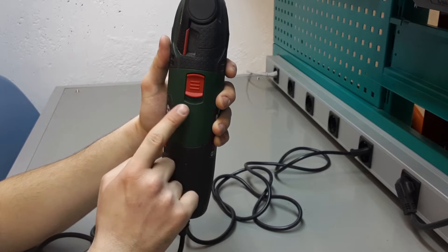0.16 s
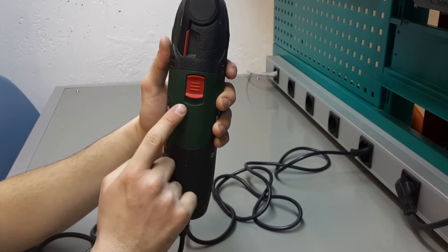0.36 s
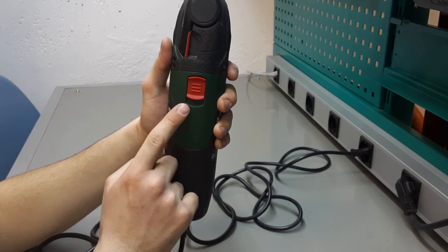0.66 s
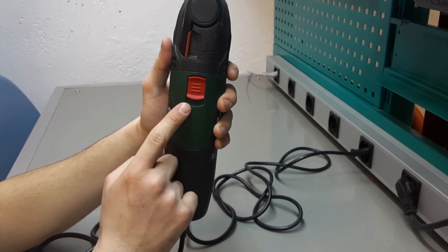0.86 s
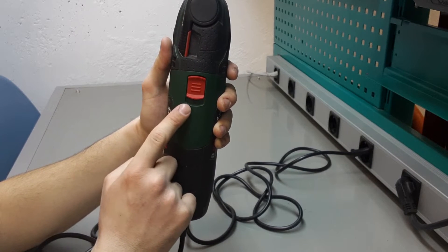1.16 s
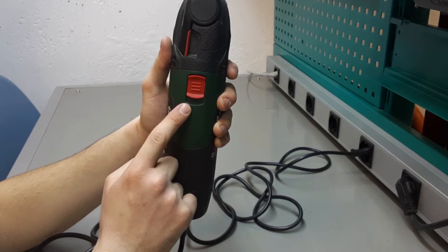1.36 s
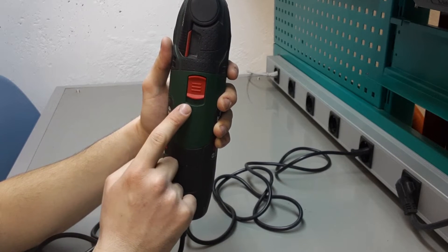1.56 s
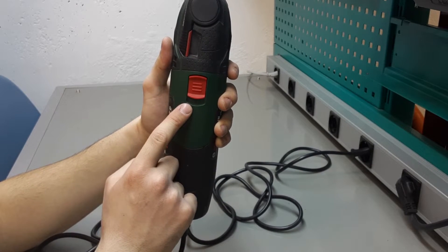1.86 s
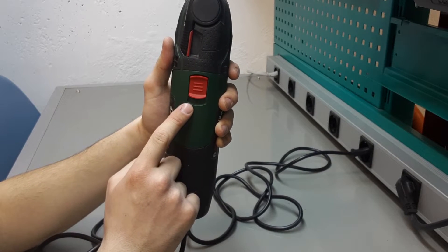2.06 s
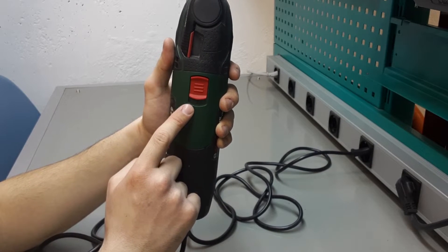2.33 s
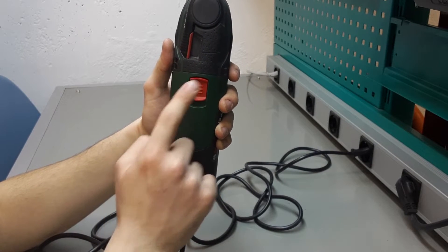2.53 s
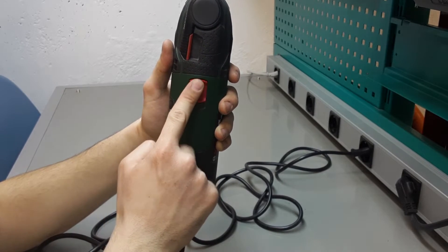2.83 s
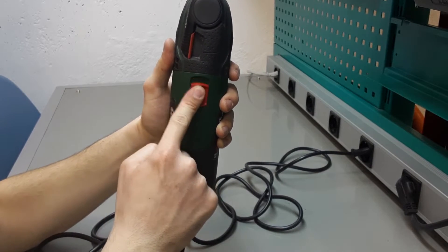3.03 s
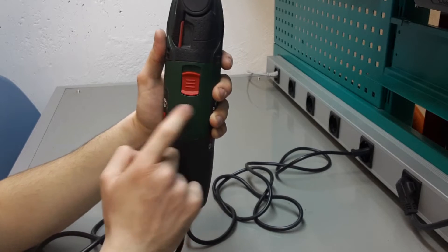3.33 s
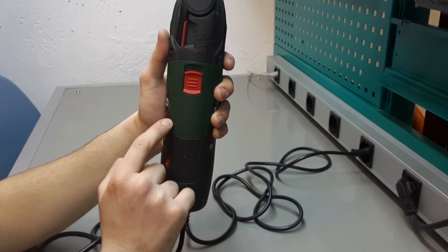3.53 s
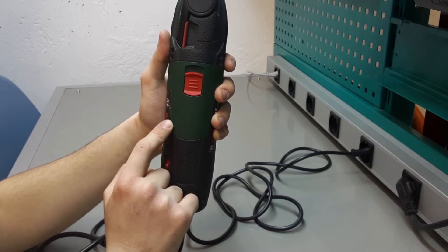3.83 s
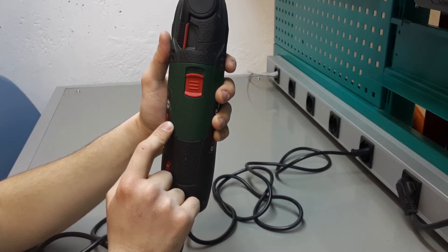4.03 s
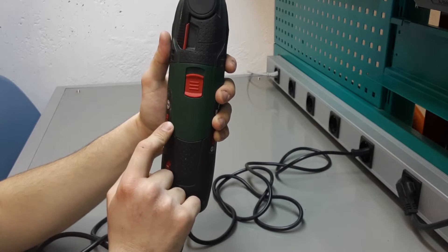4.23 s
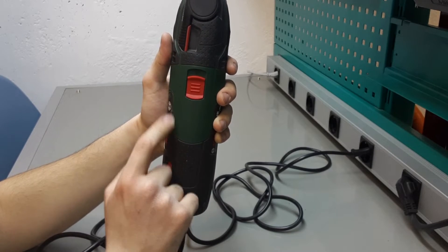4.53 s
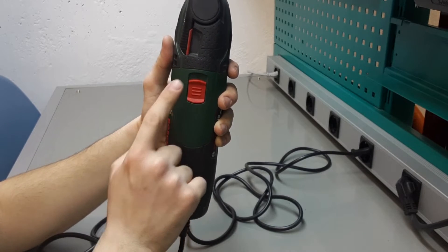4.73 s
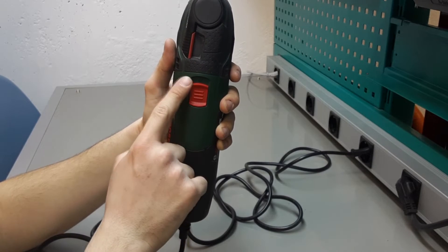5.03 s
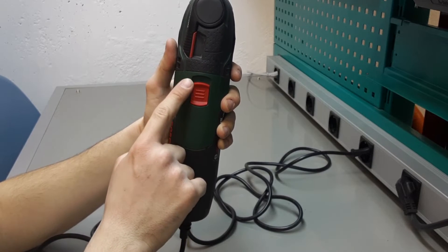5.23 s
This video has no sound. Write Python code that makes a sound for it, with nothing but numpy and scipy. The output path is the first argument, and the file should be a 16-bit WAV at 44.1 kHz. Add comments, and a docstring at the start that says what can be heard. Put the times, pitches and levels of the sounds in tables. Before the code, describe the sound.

A handheld oscillating power tool buzzes and whines steadily up close, then is switched off and winds down to rest in a quiet, faintly humming room.

```python
"""A hand-held oscillating tool runs unloaded near a stereo microphone, is switched off and coasts to rest.
Its eccentric drive whines: sines at multiples of the shaft rate. Its fork rattles the housing with two
noise bursts a turn, and its cooling fan hisses: noise that loses its top as the shaft slows.
The small workshop adds a few faint ticks, low rumbling noise, narrow hums and one nearly steady tone."""
import sys
import numpy as np
from scipy import signal
from scipy.fft import rfft, irfft, next_fast_len
from scipy.io import wavfile
from scipy.ndimage import uniform_filter1d

SR = 44100
rng = np.random.default_rng(int(sys.argv[2]) if len(sys.argv) > 2 else 0)


def to_wav(s):
    """Save 16-bit WAV."""
    ch = np.atleast_2d(s).T  # columns
    pcm = np.round(np.clip(ch, -1, 1) * 32767)  # PCM
    wavfile.write(sys.argv[1], SR, pcm.astype(np.int16))


N = 237258  # length in samples
TIME = np.arange(N) / SR  # seconds
OFF_S = 3.018  # the switch opens


def undb(db):
    """Turn a level in dB into a gain."""
    return 10 ** (np.asarray(db) / 20)


def level(x, db):
    """Scale a sound to a level in dB rms."""
    return x * undb(db) / np.sqrt(np.mean(x ** 2))


def read(table, hz):
    """Read a table of (frequency, value) at any frequency, even steps being equal pitch steps."""
    table_hz, values = np.array(table).T
    return np.interp(np.log(hz + 1), np.log(table_hz), values)


def walk(rate, step=1):
    """Random wandering: values held 1 / rate s, smoothed twice, one every step samples; spread near 1."""
    hold, count = int(SR / rate / step), -(-N // step)
    held = np.repeat(rng.standard_normal(count // hold + 1), hold)
    return 1.74 * uniform_filter1d(uniform_filter1d(held, hold), hold)[:count]


def bell(hz, centre_hz, width_hz):
    """A resonance curve that is 1 at its centre and falls away on both sides."""
    return 1 / (1 + (2 * (hz - centre_hz) / width_hz) ** 2)


def dips_db(hz):
    """Loss in dB where echoes from bench and wall cancel the sound."""
    # echo dips: (centre [Hz], width [Hz], depth [dB])
    dips = [(714, 23.6, 13), (917, 34, 8.5), (1190, 63, 8), (4490, 300, 0.5)]
    return -sum(db * bell(hz, centre_hz, width_hz) for centre_hz, width_hz, db in dips)


def housing_db(hz):
    """Lift in dB from the resonances of housing and metal head, less the echo dips."""
    # housing resonances: (centre [Hz], width [Hz], power added to a base of 0 dB [dB])
    housing = [(396.4, 26, 13), (552, 98, 7.5), (970, 35, 15), (1127, 107, 7), (1300, 50, 1.5),
               (1430, 38, 1.5), (1800, 620, 6), (2104, 51, 7), (2470, 44, 4.5), (3060, 250, -13),
               (3760, 170, 1), (5100, 100, -0.5), (5680, 14, 7.5), (6430, 33, 8.5), (7596, 59, 10),
               (8026, 63, -17), (11210, 370, 6)]
    # narrow rings of the metal head: (centre [Hz], width [Hz], power added to the same base [dB])
    head_rings = [(1552, 35, 8.5), (1867, 15, 11), (3580, 30, 3.5), (2988, 17, 8), (3270, 20, 6),
                  (3300, 20, 5.5), (4100, 18, 8.5), (4935, 44, 6), (5450, 18, 7.5), (5940, 23, 5.5)]
    power = 1 + sum(undb(2 * db) * bell(hz, centre_hz, width_hz)
                    for centre_hz, width_hz, db in housing + head_rings)
    return 10 * np.log10(power) + dips_db(hz)


def pair(envelope, colour_db, side_table, centred_db, echo_db=-61.0, t60=.12, same=.3):
    """Stereo noise from a part alike in both channels (mid, rms 1) and an opposed part (side), with echoes."""
    centred_hz = 1240  # below this, the side lacks the centred part of the colour
    size = next_fast_len(N + 8192)
    hz = np.arange(size // 2 + 1) * SR / size
    first, other = rng.standard_normal((2, N))
    noise = np.array([first, same * first + np.sqrt(1 - min(same, 1) ** 2) * other])
    # near echoes: noise that falls by 60 dB in t60 seconds
    echoes = rng.standard_normal((2, 8192)) * np.exp(-np.log(1000) * np.arange(8192) / SR / t60)
    echoes = undb(echo_db) * echoes / np.sqrt(np.sum(echoes[0] ** 2))
    # the direct side part is a quarter cycle off, so neither channel is louder
    paths = rfft(echoes, size) + np.array([[1], [1j]])
    mid, side = rfft(envelope * noise, size) * undb(colour_db(hz)) * paths
    side_db = read(side_table, hz) - (hz < centred_hz) * centred_db(hz)
    mid, side = irfft(mid, size)[:N], irfft(side * undb(side_db), size)[:N]
    return np.array([mid + side, mid - side]) / np.std(mid)


def shaft():
    """Shaft speed in turns per s: a driven curve, then friction and air drag slow it to rest."""
    # speed while driven: (time [s], speed [turns per s])
    driven_speed = [(0, 281.9), (.3, 282.25), (.75, 283.1), (1.35, 283.65), (1.75, 283.3), (2.2, 283.6),
                    (2.45, 283.55), (3.02, 284.4)]
    friction, drag_per_s = 140, .15  # turns per s lost each second; share of the speed lost each second
    driven = np.interp(TIME, *np.transpose(driven_speed))
    offset = friction / drag_per_s
    slowing = np.exp(-drag_per_s * np.maximum(TIME - OFF_S, 0))
    return np.maximum((driven + offset) * slowing - offset, 0)


def whine(speed, turn, rattle_db, waver_db=.5, flutter_db=1.3, sway=0.22):
    """Drive tones: sines locked to the shaft that waver while driven, then take the level of their pitch."""
    # tones at full speed: (multiple of the shaft rate, left base level [dB], right base level [dB],
    # left leads [radians])
    tones = [(1, -45, -58, 3.1), (2, -49, -49, -0.1), (3, -46, -47, -0.5), (4, -49, -60, 0.6),
             (5, -30.5, -36.5, 1.7), (6, -42, -47, -0.8), (7, -38, -33, -2.0), (8, -40, -45, 1.7),
             (9, -34, -37, -2.6), (10, -48, -41, 1.2), (11, -41, -38, -0.3), (12, -42, -37, -2.8),
             (13, -31, -35, 0.8), (14, -45, -46, -0.0), (15, -42, -45, -1.5), (16, -52, -50, -2.5),
             (17, -42, -36, -2.7), (18, -35, -43, -2.0), (19, -35, -34, -3.1), (20, -32, -35, 0.1),
             (21, -40, -42, -1.0), (22, -41, -45, -0.3), (23, -42, -40, 2.5), (24, -36, -38, 0.3),
             (25, -45, -45, 1.4), (29, -50, -50, 0.0), (31, -49, -48, 0.2), (39, -36, -36, 0.8)]
    # base level of a tone at each pitch while coasting: (pitch [Hz], level over the rattle [dB])
    coast_levels = [(60, -11), (110, -14), (150, -20), (190, -20), (280, -14), (340, -27), (450, -19),
                    (520, -21), (600, -26), (750, -25), (1000, -25), (1170, -16), (1260, -11), (1330, -4),
                    (1460, -5), (1510, -12), (1570, -6), (1640, -14), (1730, -5), (1820, -5), (1900, -16),
                    (1990, -5), (2060, -13), (2150, -5), (2260, -6), (2400, -15), (2520, -6), (2700, -9),
                    (2900, -11), (3050, -8), (3300, -12), (3800, -11), (4500, -17), (5700, -16),
                    (7000, -21), (8200, -25), (8700, -17), (10100, -19), (10450, -27), (10700, -21),
                    (11000, -21)]
    # phase between the channels while coasting: (pitch [Hz], left leads [radians])
    coast_leads = [(500, .1), (720, 1.5), (1400, 1.3), (2350, 1.3), (2650, 2.4), (3200, .8), (11000, .4)]
    # first balance, which settles away: {multiple of the shaft rate: level over the settled one [dB]}
    settling = {1: 3, 5: -1.5, 7: 3.5, 8: -3, 11: 5.5, 13: -1, 18: 1, 19: 7, 20: -7, 24: -6}
    # tones that swell or sink briefly: (time [s], length [s], multiple of the shaft rate, change [dB])
    flares = [(1.33, .25, 5, -8), (1.36, .12, 7, 4), (1.4, .14, 6, 6), (1.9, .14, 6, 5), (2.2, .25, 6, 8),
              (2.27, .12, 1, 8), (2.1, .2, 20, -4), (2.3, .4, 39, 1.5), (2.72, .2, 39, -5),
              (2.85, .4, 19, 7), (.5, .25, 9, 6), (.9, .2, 19, -6), (.38, .3, 13, -4), (2.35, .8, 5, -3.5),
              (2.85, .4, 18, -4), (2.9, .25, 11, 4), (.1, .25, 9, -4), (1.8, .4, 9, -3), (2.5, .15, 13, -5),
              (1.9, .15, 13, -3), (1.9, .3, 20, 2)]
    settled_s, settle_span_s = 0.5, .35  # middle and length of the settling
    sagging, sag_db_per_s = (5, 7, 20, 24), 1.5  # these multiples weaken slowly while driven
    coast_even_db, whistle_coast_db = -12.5, 5.5  # coasting: even multiples; the top whistle at full speed
    ripple_hz = 100

    out = np.zeros((2, N))
    step = 64  # samples between control values
    every = np.arange(0, N, step)
    t = every / SR
    speed, rattle_db = speed[every], rattle_db[every]
    early = np.clip((settled_s - t) / settle_span_s + .5, 0, 1)  # share of the first balance
    free = np.clip((t - OFF_S) / 0.099, 0, 1)  # share of coasting, rising after the switch opens
    fade_db = -55 * np.clip(1 - speed / 200, 0, .35)  # slowing, the tones sink into the rattle
    for k, left_db, right_db, lead in tones:
        coast_db = rattle_db + read(coast_levels, k * speed) + np.clip((k - 3) / 4, 0, 1) * fade_db
        # coasting, some multiples stand higher or lower than their pitch alone would give
        coast_db = coast_db - 3 * (15 < k < 39) + 3 * (k == 7) + (k == 9) - 6 * (k == 5)
        coast_db = coast_db + 2 * (k in (11, 13)) + (k % 2 == 0) * coast_even_db
        # the top whistle needs speed
        coast_db = coast_db + (k == 39) * (whistle_coast_db + (speed / speed.max() - 1) * 12)

        swell_db = 1 + settling.get(k, 0) * early + (k in sagging) * sag_db_per_s * (OFF_S / 2 - t)
        swell_db = swell_db + sum(db * np.exp(-(2 * (t - s) / length) ** 2)
                                  for s, length, which, db in flares if which == k)

        steady = 1 / 3 if k in (1, 39) else 1  # unbalance and the top whistle hold steadier
        waver = waver_db * walk(8.04, step) + free * 1.3 * walk(18, step)
        loose_db = steady * (waver + flutter_db * walk(30, step) - .7)
        drift = 2 * np.pi * rng.random() + steady * sway * (1 - free / 2) * walk(15, step)
        # coasting, the phase between the channels turns as the pitch slides; it sways little for the bass
        apart = (1 - free) * lead + free * read(coast_leads, k * speed)
        apart = apart + min(k / 16, .5) * sway * walk(5, step) * steady

        for channel, db, shift in ((0, left_db, apart), (1, right_db, 0.00098)):
            tone_db = (1 - free) * (db + swell_db) + free * coast_db
            gain = undb(tone_db + loose_db + steady * .8 * walk(6.09, step))
            gain, angle = (np.interp(np.arange(N), every, c) for c in (gain, drift + shift))
            out[channel] += gain * np.sin(2 * np.pi * k * turn + angle)
    # the motor's pull pulses twice per mains cycle while the switch is closed
    pull = 1 + .09 * np.cos(2 * np.pi * ripple_hz * TIME) * (TIME < OFF_S)
    return np.sqrt(2) * out * pull


def rattle(turn, sharp=0.58, uneven=0.1, scatter_db=0.5):
    """Fork rattle: knocks at both ends of its swing, two noise bursts a turn, each of its own size."""
    # spectrum before the housing acts: (frequency [Hz], relative level per Hz [dB])
    knock_colour = [(90, -37), (150, -22), (280, -11), (400, -10.5), (700, -7.5), (1200, -5.5), (1500, -2),
                    (2100, -3.5), (3200, -6), (4650, -5.5), (5800, -4.5), (8000, -18.5), (11000, -14),
                    (15700, -22.5)]
    # opposed part of the stereo: (frequency [Hz], side minus mid [dB])
    knock_side = [(60, -12.5), (110, -22), (200, -5), (380, -7), (550, -5.5), (750, -0.5), (1000, -0.5),
                  (1230, 2), (1300, -1.5), (2380, 3), (4400, -1), (8120, -3), (15000, -17)]
    swing = (2 * turn).astype(int)
    size = undb(scatter_db * rng.standard_normal(swing[-1] + 1))[swing]
    size = size * (1 + uneven * (-1.) ** swing)  # one end knocks harder
    burst = size * np.exp(-(2 * turn % 1) / sharp) + 0.38
    # even out the level over 0.1 s, then let it wander
    burst = burst / np.sqrt(uniform_filter1d(burst ** 2, 4410)) * undb(0.71 * walk(12))
    return pair(burst, lambda hz: read(knock_colour, hz) + housing_db(hz), knock_side, housing_db, echo_db=-9.0)


def lean(knocks, speed):
    """Slower knocks ring the housing's upper mids more and the band below less, and grow uneven in level."""
    # rings that rise or sink at lower speed: (centre [Hz], width [Hz], change before speed weighting [dB])
    slow_rings = [(397, 60, -6), (975, 90, -13.5), (1750, 380, 1.5), (3250, 500, -2), (5040, 110, -1),
                  (5720, 80, 6.5), (2040, 190, 7.5), (6290, 160, 7.5), (6410, 50, -8.5), (11230, 500, -4.5)]
    ring_dies, ring_span = 62, 50  # turns per s: added rings are gone below the first
    uneven_db = 2.5  # level scatter of each of two wanderings near rest
    upper, lower = (signal.sosfiltfilt(signal.butter(1, band_hz, "bandpass", fs=SR, output="sos"), knocks)
                    for band_hz in ((2400, 3100), (1600, 2330)))
    alive = np.clip((speed - ring_dies) / ring_span, 0, 1.5)  # the weakest knocks no longer make them ring
    rings = 0
    for hz, width_hz, db in slow_rings:
        ring = signal.lfilter(*signal.iirpeak(hz, hz / width_hz, fs=SR), knocks)
        rings = rings + (undb(db) - 1) * (alive if db > 0 else 1) * ring
    slow = 1 - speed / speed.max()
    leaning = knocks + slow * (0.81 * (upper - lower) + rings)
    return leaning * undb(uneven_db * slow * (walk(16) + walk(60)))


def fan(speed, turn, split_hz=9000, dulling=0.89):
    """Fan hiss: air through the slots, beaten by swing and turn; slower air loses its top first."""
    # spectrum before the housing acts: (frequency [Hz], relative level per Hz [dB])
    air_colour = [(1470, -46.5), (2500, -9), (3420, -5), (3700, -6), (4440, -8.5), (5590, -1.5), (5990, -4),
                  (7770, -5.5), (10000, -11), (11300, -10.5), (15600, -16.5)]
    # opposed part of the stereo: (frequency [Hz], side minus mid [dB])
    air_side = [(60, -12), (110, -17), (200, -11), (380, 0), (700, -8.5), (1290, 0), (2380, -10.5),
                (4400, -1.5), (8120, -6), (11000, -7.5), (15000, -11)]
    beat = 1 + .24 * np.cos(4 * np.pi * turn) + .13 * np.cos(2 * np.pi * turn)
    flow = beat * undb(.7 * walk(14))
    air = pair(flow, lambda hz: read(air_colour, hz) + .6 * housing_db(hz), air_side, lambda hz: 0,
               echo_db=-9.0)
    body = signal.sosfiltfilt(signal.butter(2, split_hz, fs=SR, output="sos"), air)
    return body + (air - body) * (speed / speed.max()) ** dulling


def ticks(t60=.02, soft_hz=3000):
    """Faint dry ticks: short bursts of noise with a softened top."""
    # single ticks: (time [s], peak level [dB], lowest frequency [Hz], highest frequency [Hz])
    tick_list = [(4.4545, -43, 2200, 6500), (5.034, -45, 1200, 12500), (5.232, -56, 1500, 13500)]
    out = np.zeros((2, N))
    t = np.arange(2200) / SR
    for s, db, low_hz, top_hz in tick_list:
        band = signal.butter(4, [low_hz, top_hz], "bandpass", fs=SR, output="sos")
        noise = rng.standard_normal((2, len(t))) + rng.standard_normal(len(t))  # partly shared by both channels
        burst = signal.sosfilt(band, noise)
        burst = signal.lfilter(*signal.butter(1, soft_hz, fs=SR), burst) * np.exp(-np.log(1000) * t / t60)
        burst = burst / np.max(np.abs(burst))
        start = int(s * SR)
        out[:, start:start + len(t)] += undb(db) * burst
    return out


def room():
    """Room sound: low rumbling noise, narrow resonant hums and one tone from somewhere in the building."""
    # rumble spectrum: (frequency [Hz], relative level per Hz [dB])
    rumble_colour = [(25, -34.5), (45, -21.5), (70, -11), (130, -2.5), (210, -11), (330, -16), (570, -17.5),
                     (750, -22), (1300, -18.5), (2200, -25), (4000, -37), (6500, -47), (11500, -52),
                     (15700, -52)]
    # opposed part of the stereo: (frequency [Hz], side minus mid [dB])
    rumble_side = [(60, -9.5), (110, -29), (200, -7.5), (330, -10.5), (550, -13), (700, -4), (1290, -2.5),
                   (2380, 2.5), (4400, -0.5), (8120, -5), (15000, -22)]
    # hums made of filtered noise: (centre [Hz], width [Hz], level before stereo balance [dB rms])
    hums = [(138, 13, -66.5), (181.2, 8.3, -59.5), (766, 7.6, -69.5)]
    rumble_db, swell_s, swell_db_per_s = -49.5, 4.7, 3  # the rumble swells from swell_s on
    tone_hz, tone_db = 255.8, -54.5  # level before the stereo balance

    swell_db = swell_db_per_s * np.maximum(TIME - swell_s, 0)
    envelope = undb(.6 * walk(2.9) + swell_db)
    rumble = pair(envelope, lambda hz: read(rumble_colour, hz) + dips_db(hz), rumble_side, dips_db)
    rumble = undb(rumble_db) * rumble
    tone_gain = np.sqrt(2) * undb(tone_db + 0.57 * walk(6))
    tones = tone_gain * np.sin(2 * np.pi * tone_hz * TIME + .5 * walk(6.2))
    for hz, width_hz, db in hums:
        b, a = signal.iirpeak(hz, hz / width_hz, fs=SR)
        hum = signal.lfilter(b, a, signal.lfilter(b, a, rng.standard_normal(N)))
        tones = tones + level(hum, db)
    # both lie a little to the left
    return rumble * undb(np.array([[.6], [-.6]])) + tones * undb(np.array([[2.1], [-2.1]]))


def scene():
    """The tool, loud or soft with its speed, over the ticks and the room."""
    # loudness of the moving parts: (speed [turns per s], rattle level [dB], fan level [dB])
    effort = [(28, -78, -80), (45.3, -60.5, -70), (60.7, -54.5, -65), (82.7, -45.5, -49.5),
              (104.5, -38.5, -41.5), (137, -34.5, -35.5), (188, -32.5, -30), (225, -30, -26),
              (278, -29.5, -25)]
    speed = shaft()
    turn = np.cumsum(speed) / SR  # turns made so far
    effort_speed, *parts = np.transpose(effort)
    rattle_db, fan_db = (np.interp(speed, effort_speed, part_db) for part_db in parts)
    knocks = undb(rattle_db) * lean(rattle(turn), speed)
    hiss = undb(fan_db) * fan(speed, turn)
    tool = knocks + hiss + whine(speed, turn, rattle_db)
    stop = np.clip(speed / 14 - 1, 0, 1)  # the last turns die away
    return stop * tool + room() + ticks()


def record(dry):
    """The recorder cuts the top steeply above 15.8 kHz."""
    return signal.sosfilt(signal.ellip(12, .2, 80, 15800, fs=SR, output="sos"), dry)


dry = scene()
out = record(dry)
to_wav(out)
```